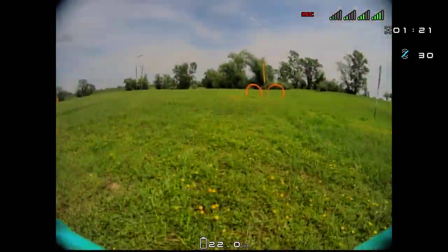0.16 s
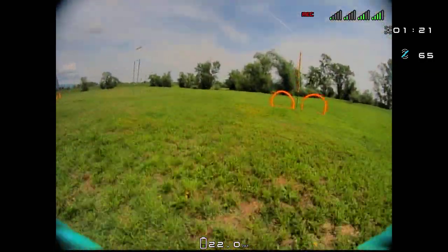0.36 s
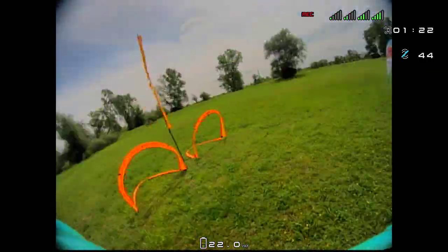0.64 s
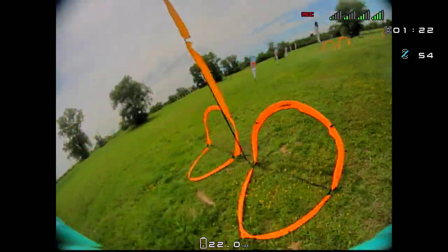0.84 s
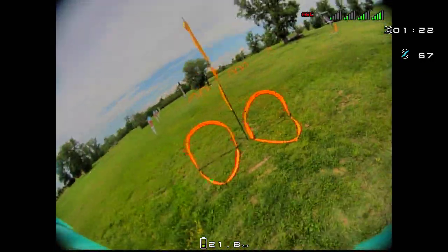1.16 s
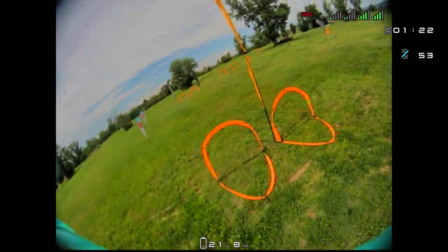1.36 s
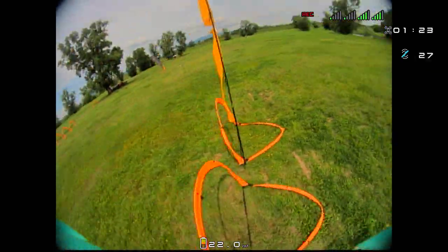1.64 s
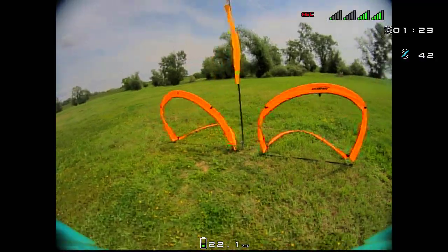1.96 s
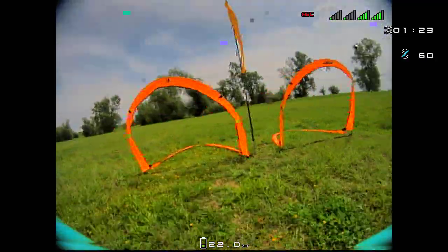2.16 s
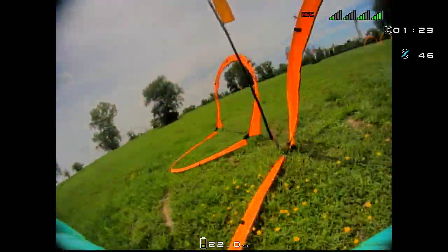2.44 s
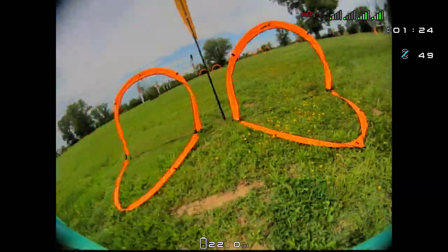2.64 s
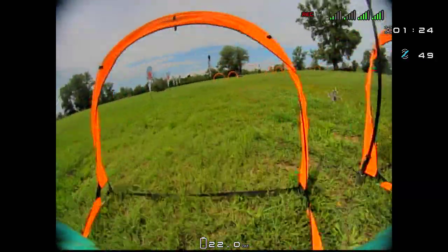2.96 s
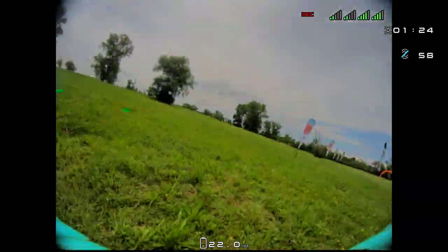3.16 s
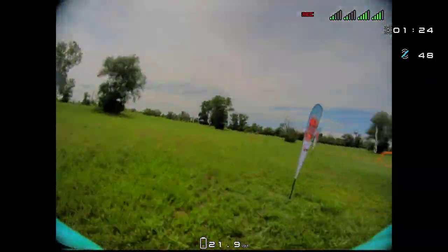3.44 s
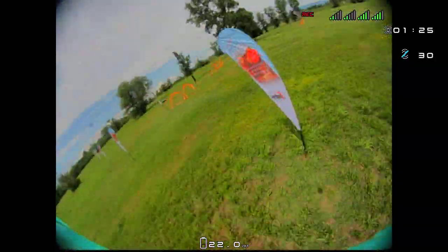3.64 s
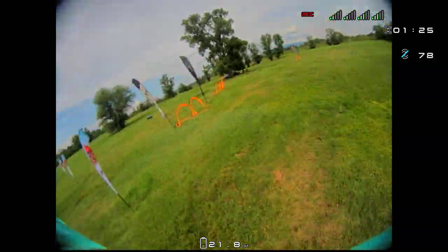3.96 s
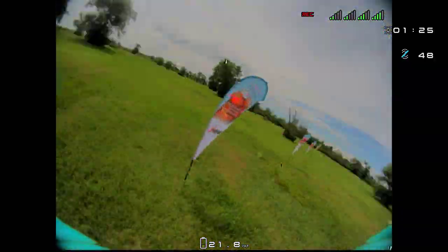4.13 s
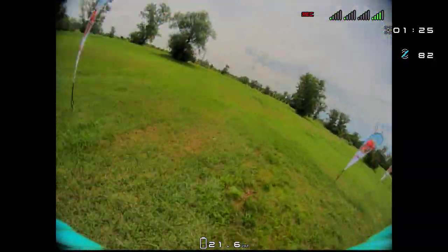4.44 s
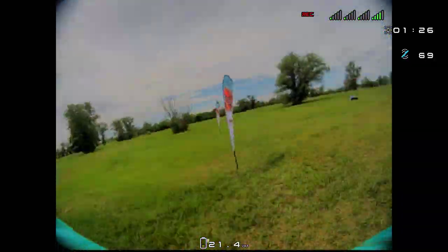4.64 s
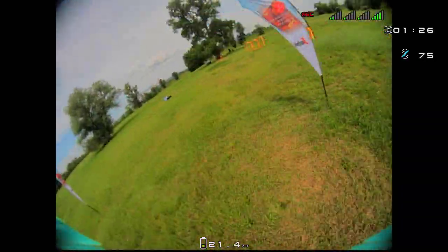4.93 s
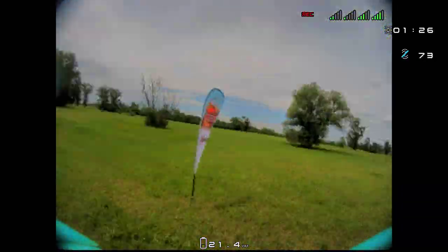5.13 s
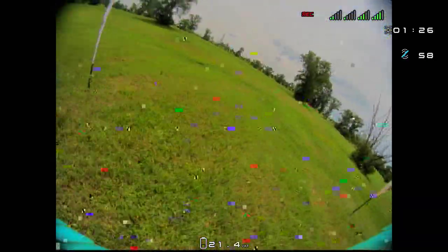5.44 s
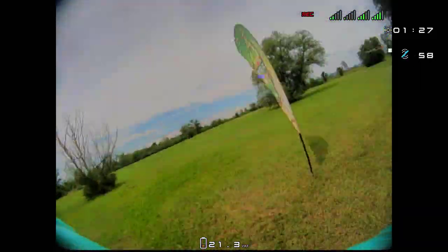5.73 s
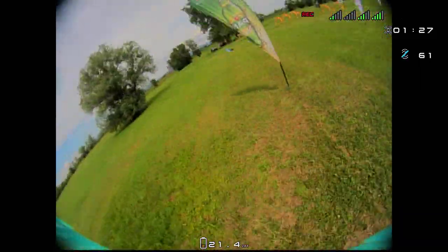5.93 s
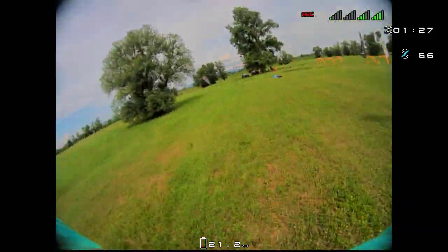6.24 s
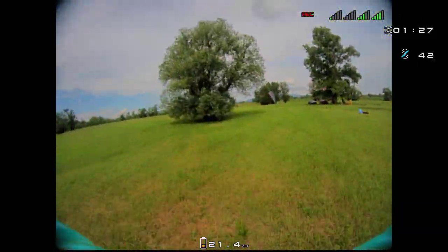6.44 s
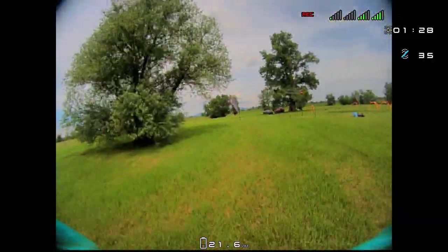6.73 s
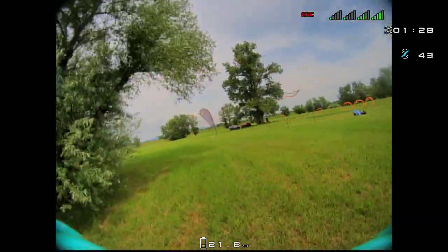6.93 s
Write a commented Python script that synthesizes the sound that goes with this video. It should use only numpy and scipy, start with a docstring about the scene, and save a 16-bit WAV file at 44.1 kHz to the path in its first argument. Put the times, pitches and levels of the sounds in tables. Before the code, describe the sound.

On board a small racing drone over an open grassy field, four propellers whine slightly out of tune, beating and rasping. The pitch dips and leaps in short throttle bursts, moderate at first, quieter around two to three and a half seconds, then louder and more frantic. Airy hiss follows each burst; low wind rumble, a few soft buffets, hum and thin whistle sit beneath. Very close microphone, dry, no echo.

```python
"""Racing quadcopter, heard from on board

Four three-blade propellers whine at their own speeds, surging and sagging: harmonics of each blade rate.
Their blades tear the air into a hiss: shaped noise pulsing once per blade.
Under them lie a rumble with short buffets, a hum, a thin whistle and a faint hiss, from noise and sines."""
import sys
import numpy as np
from scipy.fft import rfft, irfft, next_fast_len
from scipy.io import wavfile
from scipy.ndimage import map_coordinates

SR = 44100
rng = np.random.default_rng(int(sys.argv[2]) if len(sys.argv) > 2 else 0)


def wav_record(signal):
    """Record a signal, one row per channel, as 16-bit PCM in the file named by sys.argv[1]."""
    frames = np.transpose(np.atleast_2d(signal))
    bounded = np.clip(frames, -1, 1)
    # unit amplitude maps onto the largest positive 16-bit level
    quanta = np.round(bounded * 32767).astype(np.int16)
    wavfile.write(sys.argv[1], SR, quanta)


N = 312669


def amp(db):
    """Decibels to gain."""
    return 10 ** (np.asarray(db) / 20)


def unit(x):
    """Scale to rms 1."""
    return x / np.sqrt(np.mean(x ** 2) + 1e-20)


def wobble(knots_per_s):
    """Smooth random curve of rms 1."""
    coarse = np.arange(0, N + 16, 16)
    knots = rng.standard_normal(int(N * knots_per_s / SR) + 4)
    curve = map_coordinates(knots, [coarse * knots_per_s / SR])
    return unit(np.interp(np.arange(N), coarse, curve))


def filtered(x, response):
    """Multiply the spectrum of x by a response of frequency in Hz."""
    size = next_fast_len(N + SR // 2)
    spectrum = rfft(x, size) * response(np.fft.rfftfreq(size, 1 / SR))
    return irfft(spectrum, size)[..., :N]


def coloured(x, spectrum):
    """Shape x by (Hz, dB) points on a log frequency axis, at rms 1."""
    point_hz, point_db = np.transpose(spectrum)
    return unit(filtered(x, lambda hz: amp(np.interp(np.log(hz + 1), np.log(point_hz), point_db))))


def tone(angle):
    """Sine of rms 1 with a random starting phase."""
    return np.sqrt(2) * np.sin(angle + rng.uniform(0, 2 * np.pi))


def glide(times, values, t):
    """Ease from each value to the next along half a cosine."""
    count = np.arange(len(times))
    whole, part = np.divmod(np.interp(t, times, count), 1)
    return np.interp(whole + .5 - .5 * np.cos(np.pi * part), count, values)


def flight():
    """Throttle punches: motors dip, spin up to a crest, sag; gives blade rates, acceleration and levels."""
    # start_s, rise_s, stagger_s (propellers 1 and 4 lead, 2 and 3 lag), speed_lost_in_dip (0-1),
    # torn_air_lost_in_dip_db, crest blade rates: prop_1_hz, prop_2_hz, prop_3_hz, prop_4_hz,
    # relative crest levels: fundamental_db, octave_db, third_harmonic_db, torn_air_db
    punches = [(-0.212, 0.19, 0.066, 0.24, 7.0, 1147, 1240, 1150, 1000, -42.5, -55, -45, -32),
               (0.306, 0.35, 0.057, 0.16, 11.5, 1190, 1210, 1100, 1198, -35, -47.5, -56, -41.5),
               (0.812, 0.141, -0.022, 0.28, 8, 1110, 1045, 1240, 871, -32, -33, -41.5, -29.5),
               (1.034, 0.26, -0.053, 0.06, 6.0, 1346, 805, 1510, 1378, -28, -39.0, -35.5, -26),
               (1.503, 0.17, -0.023, 0.26, 6.2, 1445, 1485, 800, 1514, -33.5, -37, -43.3, -31.4),
               (1.913, 0.18, 0.014, 0.17, 0.5, 1116, 872, 960, 998, -45, -46, -49.4, -38.3),
               (2.151, 0.34, 0.089, 0.03, -0.3, 1225, 930, 1060, 1200, -38.6, -36, -39, -34.5),
               (2.677, 0.17, 0.052, 0.17, 5.5, 1173, 974, 1050, 1035, -42, -37.5, -41.5, -31.5),
               (3.116, 0.088, -0.0068, 0.17, 1.1, 1211, 1120, 1210, 1197, -53.7, -49.5, -51.5, -37.5),
               (3.304, 0.2, -0.018, 0.03, 0, 1206, 1020, 1297, 1095, -38.5, -41.9, -43.5, -34),
               (3.6, 0.12, -0.0094, 0.14, -0.5, 1090, 1020, 880, 1099, -52, -41, -46, -34.5),
               (3.81, 0.2, 0.0021, 0.27, 3.5, 1528, 1370, 1520, 1400, -22.5, -28.5, -33, -27.0),
               (4.075, 0.033, 0.018, 0.02, 0, 1522, 1455, 1480, 1154, -30.5, -40.0, -35.5, -27.5),
               (4.285, 0.21, -0.0093, 0.4, 13.8, 1580, 1460, 1140, 1397, -26.5, -28.5, -35.0, -22),
               (4.68, 0.16, 0.0075, 0.01, 10.5, 1168, 1040, 1470, 1519, -29.5, -36, -41, -29),
               (4.962, 0.114, -0.005, 0.11, 5.5, 1398, 1475, 1100, 965, -26.8, -29, -26, -23),
               (5.107, 0.1, -0.005, 0.0, 2, 1400, 1540, 1235, 1009, -30.6, -36.5, -31.5, -26.5),
               (5.274, 0.11, 0.01, 0.1, 3.5, 1404, 1324, 768, 1158, -34.5, -29.5, -37, -28),
               (5.424, 0.193, 0.014, 0.19, 3, 1428, 1452, 1178, 1382, -28.5, -37.5, -41.5, -33.9),
               (5.775, 0.11, -0.008, 0.2, 12, 1530, 1200, 1480, 1160, -38.5, -38.5, -49, -30.5),
               (6.017, 0.23, -0.0065, 0.12, 1.0, 1080, 1370, 1374, 1390, -30.5, -31.5, -34.2, -29),
               (6.341, 0.044, -0.015, 0.16, 1, 1155, 1380, 1448, 1523, -29.5, -34.2, -38, -30),
               (6.566, 0.053, 0.074, 0.1, 0.5, 990, 858, 1000, 932, -51.5, -53.5, -49.5, -46.8),
               (6.852, 0.172, 0.032, 0.16, 7.5, 1460, 1170, 1370, 1137, -37.6, -39.5, -48, -31)]
    arch = 1.35  # over 1: broad crests, narrow dips
    whine_dip, slap_dip = 1.13, .94  # dB lost per dB that the torn air loses
    whine_push_db, slap_push_db, air_push_db = 2.5, 3.5, 0.1  # gain at full acceleration
    full_push_per_s = 3.05  # relative speed rise, scale of the soft limit

    t = np.arange(0, N, 64) / SR
    columns = np.transpose(punches)
    start, rise, stagger, dip, dip_db, *crest_hz, whine_db, octave_db, third_db, air_db = columns
    crests = start + rise
    turns = np.column_stack([start, crests]).ravel()
    crest = lambda column: glide(crests, column, t)

    def sag(depth, when):
        """Zero on the crests, depth at the start of each punch."""
        shape = glide(turns, np.tile([1, 0], len(start)), when) ** arch
        return shape * np.append(depth, 0)[np.searchsorted(crests, when)]

    # to bank the craft, one pair of motors acts before the other
    lead_s = crest(stagger)
    speeds = np.array([crest(hz) * (1 - sag(dip, t + side * lead_s))
                       for hz, side in zip(crest_hz, (1, -1, -1, 1))])
    rise_per_s = np.gradient(np.log(speeds), t, axis=1)
    spin_up = np.tanh(rise_per_s / full_push_per_s)
    push, lull_db = spin_up.mean(axis=0), sag(dip_db, t)
    slap_db = slap_push_db * push - slap_dip * lull_db
    levels = [crest(whine_db) + whine_push_db * push - whine_dip * lull_db,
              crest(octave_db) + slap_db,
              crest(third_db) + slap_db,
              crest(air_db) + air_push_db * push - lull_db]
    full_rate = lambda rows: np.array([np.interp(np.arange(N) / SR, t, row) for row in rows])
    return full_rate(speeds), full_rate(spin_up), full_rate(levels)


def blade_harmonics(blade, levels, share, slap_share, flutter_db):
    """Thrust gives the blade-rate fundamental; blade slap gives its octave and third harmonic."""
    thrust_db, octave_db, third_db, _ = levels
    sound = share * amp(thrust_db - 0.56 + flutter_db * wobble(50)) * tone(blade)
    for multiple, db in enumerate((octave_db + flare(), third_db), 2):
        sound += slap_share * amp(db - 0.76 + 3.14 * wobble(150)) * tone(multiple * blade)
    return sound


def rasp(blade, levels, share, smear_rad, flutter_db):
    """Blades cutting through turbulence make high overtones; more turbulence blurs them more."""
    # blade_rate_multiple, relative_level_db
    overtone_points = [(4, -13), (6, -16), (9, -24)]
    third_share, gain_db = .25, 2.5  # how far the level follows the third harmonic, not the torn air
    *_, third_db, air_db = levels
    rasp_db = air_db + third_share * (third_db - air_db) + gain_db
    blur_rad = smear_rad * amp(.5 * (air_db + 39.5))
    sound = np.zeros(N)
    for multiple in range(4, 10):
        db = np.interp(multiple, *np.transpose(overtone_points))
        angle = multiple * (blade + blur_rad * wobble(420))
        sound += share * amp(rasp_db + db + flutter_db * wobble(25)) * tone(angle)
    return sound


def shaft_tones(blade, blade_hz, levels, share, flutter_db):
    """Imbalance shakes the frame once per turn; unequal blades sound at multiples of the shaft rate."""
    # shaft_rate_multiple, relative_level_db
    uneven_blades = [(2, -17.5), (4, -17), (5, -21.5), (8, -20)]
    shake_db, shake_per_thrust = -32.5, 0.61  # dB, and dB per dB of the fundamental
    air_share, uneven_db = .65, -.5  # how far unequal-blade tones follow the torn air, not the thrust
    thrust_db, *_, air_db = levels
    shaft = blade / 3  # three blades
    # the shake grows with speed and thrust
    shake = amp(shake_db + shake_per_thrust * thrust_db) * (blade_hz / 1500) ** 1.6
    sound = share * shake * tone(shaft)
    unevenness = share * amp(thrust_db + air_share * (air_db - thrust_db) + uneven_db)
    for multiple, db in uneven_blades:
        sound += unevenness * amp(db + flutter_db * wobble(37)) * tone(multiple * shaft)
    return sound


def propeller(blade_hz, levels, share, slap_share):
    """One propeller: its tones, and its turbulence pulsing once per blade."""
    drift, jitter = 0.002976, 0.003034  # rms fraction of speed
    flutter_db, chop = 2.5, 0.89  # chop: pulse depth 0-1
    # the flight controller keeps trimming the speed, slowly and in a fast tremble
    speed_hz = blade_hz * (1 + drift * wobble(30) + jitter * wobble(260))
    blade = 2 * np.pi * np.cumsum(speed_hz) / SR
    tones = blade_harmonics(blade, levels, share, slap_share, flutter_db)
    tones += rasp(blade, levels, share, smear_rad=0.12, flutter_db=4.5)
    tones += shaft_tones(blade, blade_hz, levels, share, flutter_db)
    air = share * rng.standard_normal(N) * (1 + chop * np.cos(blade))
    return tones, air


def torn_air(turbulence):
    """Turbulence at the blades: shaped noise whose finest eddies come and go as the craft crosses its wake."""
    # frequency_hz, relative_density_db
    air_spectrum = [(200, -7), (550, -11), (850, 4), (1750, 3), (2800, 3.5), (6000, 4), (8500, 5),
                    (10000, -1), (15700, -22)]
    roar = coloured(turbulence, air_spectrum)
    fizz = filtered(roar, lambda hz: 1 - 1 / (1 + (hz / 6500) ** 6))
    return roar + fizz * (amp(2.6 * wobble(16)) - 1)


def quadcopter():
    """Four propellers share the load: the faster are louder, the accelerating slap more."""
    overtone_top_hz = 8300  # the whine rolls off from here
    speeds, spin_up, levels = flight()
    air_db = levels[-1]
    relative_speed = speeds / speeds.max(axis=0)
    split = lambda weights: weights / np.linalg.norm(weights, axis=0)
    shares = split(amp([[1], [-.5], [-2], [-2.5]]) * relative_speed ** 1.82)
    slap_gain_db = [[1.5], [-.5], [-2.5], [-3]] + 6.5 * spin_up
    slap_shares = split(amp(slap_gain_db) * relative_speed ** 3.17)
    whine, turbulence = np.zeros(N), np.zeros(N)
    for blade_hz, share, slap_share in zip(speeds, shares, slap_shares):
        tones, air = propeller(blade_hz, levels, share, slap_share)
        whine += tones
        turbulence += air
    whine = filtered(whine, lambda hz: 1 / np.hypot(1, (hz / overtone_top_hz) ** 3))
    return whine + amp(air_db - 2.3 + 1.0 * wobble(130)) * torn_air(turbulence)


def wind():
    """Low-passed noise: a rumble with one long swell, and a few short, deep buffets."""
    # frequency_hz, relative_density_db
    rumble_spectrum = [(20, -3.5), (70, 0.5), (145, -10.5), (300, -22), (700, -36)]
    # centre_s, peak_level_db
    buffet_times = [(.1, -36), (1.421, -31), (2.65, -36), (6.36, -32), (6.489, -33.5)]
    swell_s, swell_width_s, swell_db = 3.1, 1.0, 4  # middle, half-width, gain
    t = np.arange(N) / SR
    gusts = sum(amp(db) * np.exp(-((t - s) / 0.033) ** 2) for s, db in buffet_times)
    buffets = gusts * unit(filtered(rng.standard_normal(N), lambda hz: np.exp(-(hz / 28) ** 2)))
    rumble = coloured(rng.standard_normal(N), rumble_spectrum)
    rumble = unit(filtered(rumble, lambda hz: 1 / (1 + (hz / 900) ** 2)))
    rumble_db = -48.2 + swell_db * np.exp(-((t - swell_s) / swell_width_s) ** 2)
    return buffets + amp(rumble_db) * rumble


def electronics():
    """Steady sines plus narrow noise bands make a wavering hum and a thin whistle, over a faint even hiss."""
    # frequency_hz, level_db_rms
    hum_bands = [(57, -62), (82, -52.5), (180, -58), (246, -64), (504, -69)]
    whistle_hz = 13953
    cycle = 2 * np.pi * np.arange(N) / SR  # phase of 1 Hz

    def band(hz, knots_per_s):
        """Narrow noise: a carrier with two random quadratures."""
        in_phase = wobble(knots_per_s) * np.cos(hz * cycle)
        return unit(in_phase + wobble(knots_per_s) * np.sin(hz * cycle))

    hum = sum(amp(db) * unit(tone(hz * cycle) + 0.5 * band(hz, 22)) for hz, db in hum_bands)
    whistle = amp(-71) * tone(whistle_hz * cycle) + amp(-66) * band(whistle_hz, 220)
    hiss = unit(filtered(rng.standard_normal(N), lambda hz: 1 / np.hypot(1, hz / 2500)))
    return hum + whistle + amp(-48.5) * hiss


def flare():
    """Decibels added to the octave: one abrupt jump that fades exponentially."""
    start_s, jump_db, fade_s = 6.048, 11.5, 0.12
    age_s = np.arange(N) / SR - start_s
    return jump_db * (age_s > 0) * np.exp(-abs(age_s) / fade_s)


def scene():
    """One microphone feeds both channels."""
    return np.tile(quadcopter() + wind() + electronics(), (2, 1))


def record(dry):
    """The recorder keeps nothing above its band limit and sits slightly off zero."""
    top_hz, offset = 15750, -.0136
    return filtered(dry, lambda hz: hz < top_hz) + offset


dry = scene()
out = record(dry)
wav_record(out)
```